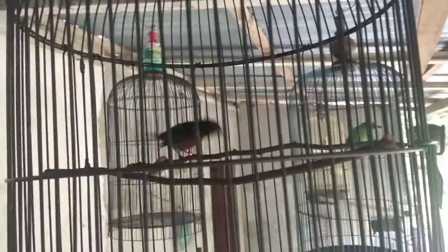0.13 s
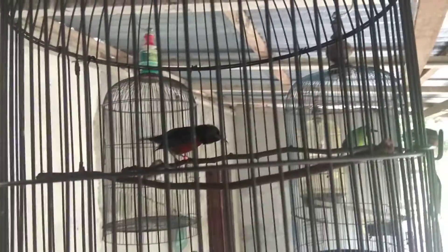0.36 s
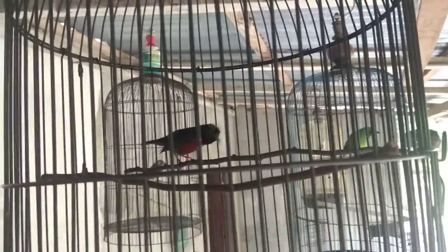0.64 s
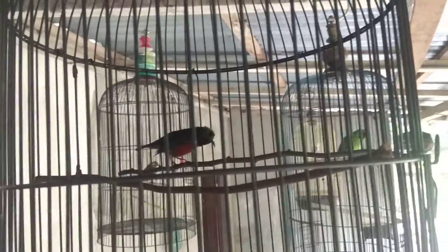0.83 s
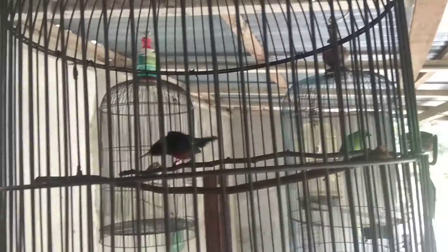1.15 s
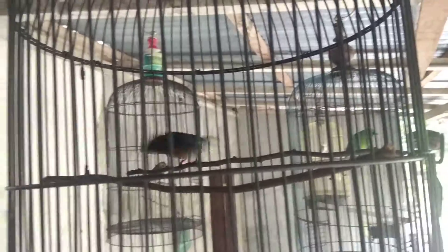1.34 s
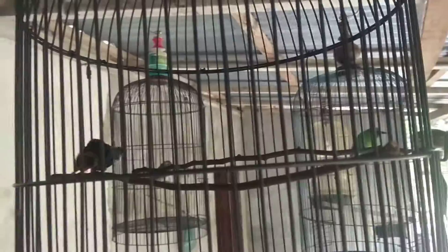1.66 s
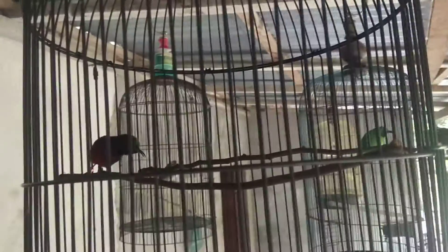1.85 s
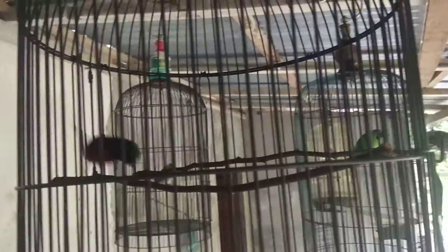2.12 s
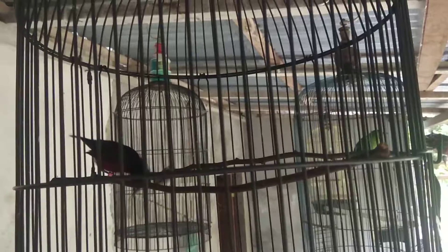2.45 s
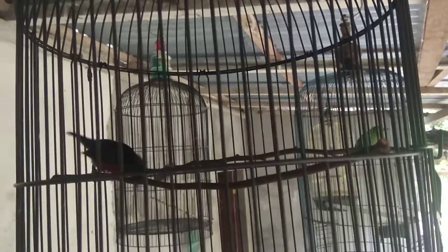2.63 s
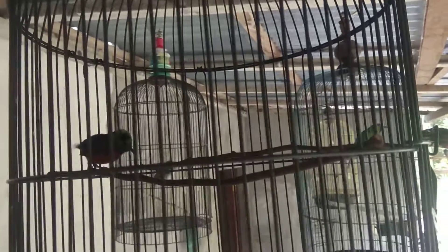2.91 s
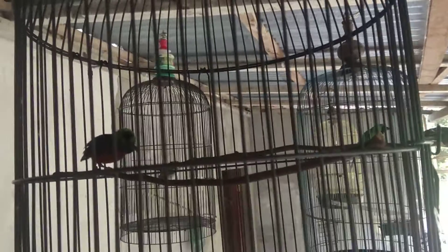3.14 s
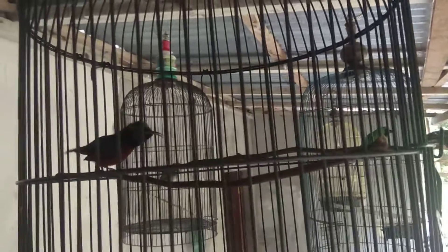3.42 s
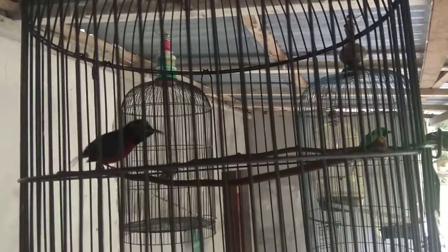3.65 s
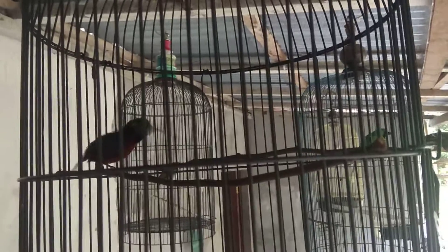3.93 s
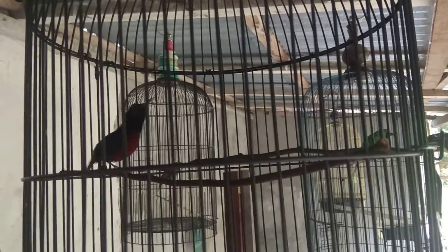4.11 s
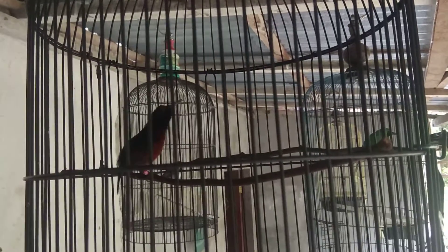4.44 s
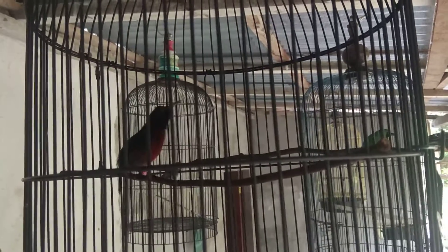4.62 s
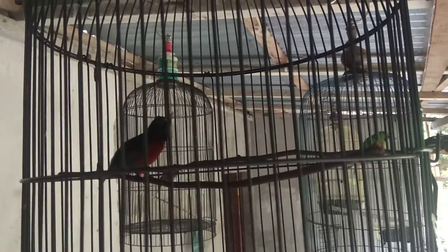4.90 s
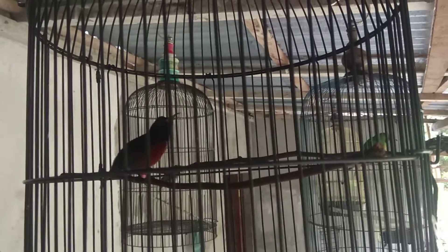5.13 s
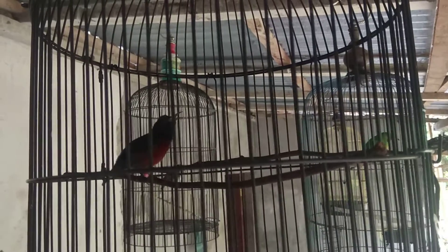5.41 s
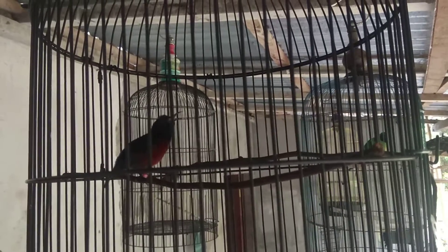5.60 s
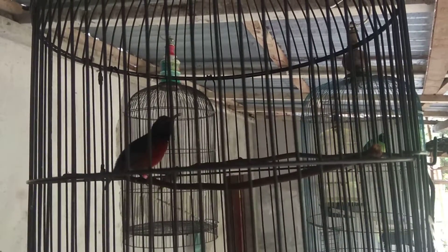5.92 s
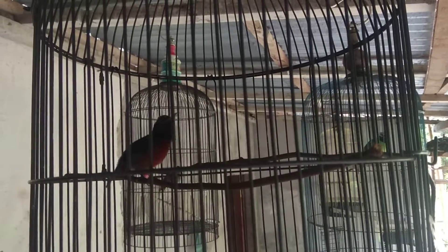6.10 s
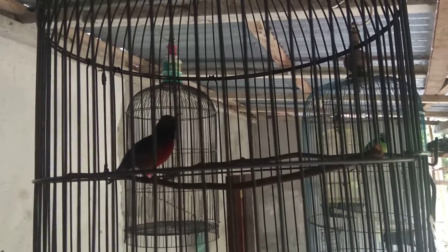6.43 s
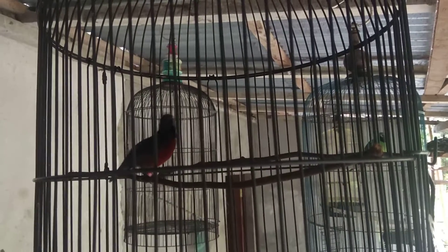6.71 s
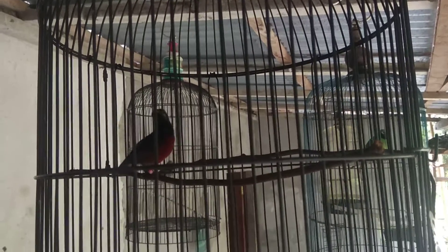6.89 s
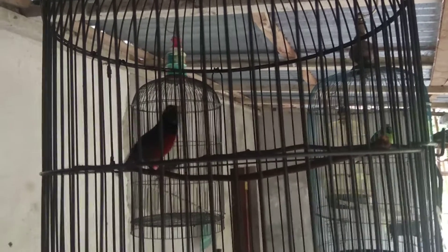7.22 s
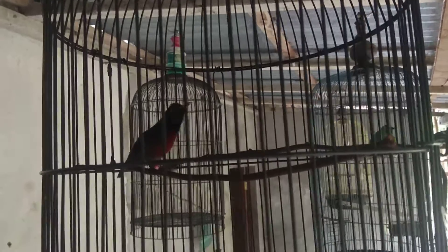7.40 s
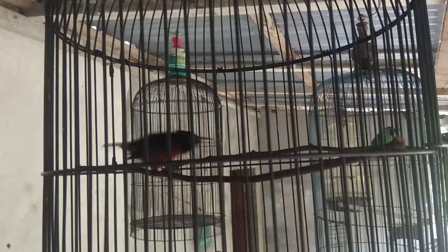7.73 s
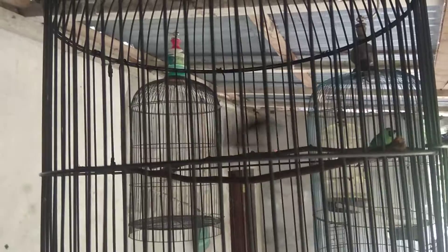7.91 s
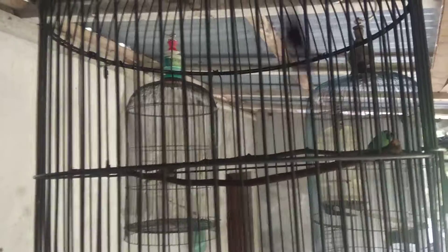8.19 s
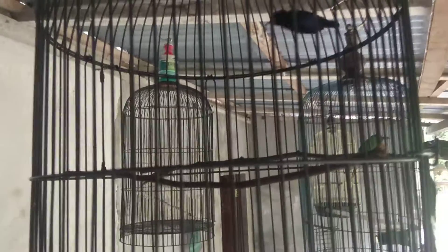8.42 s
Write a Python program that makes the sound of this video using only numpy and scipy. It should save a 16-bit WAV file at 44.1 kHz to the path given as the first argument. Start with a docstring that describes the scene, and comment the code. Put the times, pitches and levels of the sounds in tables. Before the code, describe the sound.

A small bird in a cage close to a phone sings loudly: brief buzzy warbles, two quick chip calls, light foot scuffs and more warbles. From the middle it fires a long run of sharp four-note chips, pauses, gives one last twitter and flutters away. Hard roof and walls add a short bright ring; distant traffic, a faint engine and swelling insect hiss lie behind.

```python
"""Under a sheet roof, in a cage close to a phone, a small bird hops about and sings.
Its syrinx whistles warbled phrases of bending pitch, in turn with runs of sharp four-note chips.
Filtered noise bursts are its feet and wings on the perches; the roof and walls ring briefly.
Behind it, shaped noise makes distant traffic and the thin whine and swelling hiss of insects;
summed harmonics make one passing engine, and soft gliding whistles are far birds."""
import sys
import numpy as np
from scipy import signal
from scipy.fft import rfft, irfft, next_fast_len
from scipy.io import wavfile
from scipy.ndimage import uniform_filter1d, minimum_filter1d, map_coordinates

SR = 44100
rng = np.random.default_rng(int(sys.argv[2]) if len(sys.argv) > 2 else 0)


def transcribe(u):
    """Save the signal u as a 16-bit wav file named by the first command-line argument.

    u: samples, shape (n,) or (channels, n), limited to [-1, 1]; the rate is SR.
    q: integer samples, one column per channel.
    """
    v = np.clip(np.atleast_2d(u).T, -1, 1)
    q = np.round(v * 32767).astype(np.int16)
    wavfile.write(sys.argv[1], SR, q)


N = 377054
T = np.arange(N) / SR


def undb(db):
    """Logarithmic level: decibels become an amplitude gain."""
    return 10 ** (np.asarray(db) / 20)


def unit(x):
    """Normalisation: scale to an rms of 1."""
    return x / np.sqrt(np.mean(x ** 2))


def curves(rows, t):
    """Linear interpolation: join each column of a table by straight lines in time."""
    s, *columns = np.transpose(rows)
    return [np.interp(t, np.sort(s), column) for column in columns]


def colour(x, points, tilt_db=0):
    """Spectral shaping: filter by (Hz, dB) points, with a tilt per octave above the second point."""
    size = next_fast_len(x.shape[-1])
    octave = np.log2(np.maximum(np.fft.rfftfreq(size, 1 / SR), 1))
    hz, db = np.transpose(points)
    shape_db = np.interp(octave, np.log2(hz), db)
    tilt = tilt_db * np.maximum(octave - np.log2(hz[1]), 0)
    return irfft(rfft(x, size) * undb(shape_db + tilt), size)[..., :x.shape[-1]]


def walk(rate, size=N):
    """Slow random modulation: a smoothed wander with a spread a little below 1."""
    hold = max(int(SR / rate), 1)
    steps = np.repeat(rng.standard_normal(size // hold + 2), hold)
    return uniform_filter1d(steps, hold)[:size]


def add(track, start, sound):
    """Superposition: mix a sound into a track at a time in seconds."""
    i = max(int(start * SR), 0)
    track[i:i + len(sound)] += sound[:max(N - i, 0)]


def air(points, side_db):
    """Partial coherence: coloured stereo noise with a shared middle and an opposed side part."""
    mid, side = colour(rng.standard_normal((2, N)), points)
    return unit(mid + undb(side_db) * side * np.array([[1], [-1]]))


# Distant traffic. Each row: time in seconds, rumble in dB, road noise in dB, both before a trim.
TRAFFIC = [(0.0, -57, -60.5), (2.36, -53.5, -56), (2.64, -53.5, -57), (5.5, -57, -55.5), (6.26, -53, -55.5),
           (8.55, -52.5, -61.5)]
# Spectrum of the traffic rumble. Each row: frequency in Hz, relative density in dB per Hz.
RUMBLE_COLOUR = [(25, -42.5), (70, -27), (100, -10.5), (130, 1), (180, 3.5), (220, -2), (310, -3.5),
                 (400, -2.5), (480, -19), (800, -49)]
# Spectrum of the road noise. Each row: frequency in Hz, relative density in dB per Hz.
ROAD_COLOUR = [(150, -15), (350, -5), (600, 0.5), (800, -5.5), (1200, -8.5), (1700, -9), (2500, -11.5),
               (3500, -16), (4600, -13), (6000, -17), (11000, -13.5), (16000, -14)]


def traffic():
    """Broadband noise: a low rumble and a road hiss, each with an unsteady level."""
    rumble_db, road_db = curves(TRAFFIC, T)
    rumble = air(RUMBLE_COLOUR, side_db=-18.5) * undb(rumble_db + 0.14 + 1.0 * walk(8.3))
    road = air(ROAD_COLOUR, side_db=-0.5) * undb(road_db + 6.5 + 2.78 * walk(17))
    return rumble + road


# A distant engine. Each row: time in seconds, sixth harmonic in Hz, level of the low hum in dB,
# level of the upper hum in dB, both before the exhaust filter.
ENGINE = [(0, 461.7, -61, -65), (1.4, 470.4, -62, -66), (2.2, 478.5, -68, -55.5), (5.2, 471, -60, -62),
          (6.2, 456.7, -57, -65.5), (7.35, 442, -63.5, -58), (7.8, 410, -57, -79.5),
          (8.55, 355, -72.5, -73)]
# Harmonic numbers that sound: two for the low hum, two for the upper hum.
ENGINE_ORDERS = (5, 6, 7, 8)
# Resonances of its exhaust. Each row: frequency in Hz, gain in dB.
EXHAUST = [(340, -10.5), (405, 3), (470, -8), (555, 1), (630, -3.5)]


def engine():
    """Harmonic series through resonances: four harmonics throb together, coloured by the exhaust."""
    sixth_hz, low_db, upper_db = curves(ENGINE, T)
    phase = 2 * np.pi * np.cumsum(sixth_hz / 6 * (1 + .01 * walk(30))) / SR
    throb_db = 4 * np.sin(2 * np.pi * np.cumsum(8.4 + .5 * walk(3)) / SR)  # about 8.4 throbs per s
    hum = np.zeros(N)
    for order, db in zip(ENGINE_ORDERS, [low_db, low_db, upper_db, upper_db]):
        hum += undb(db + throb_db + 2 * walk(5.1)) * np.sin(order * phase)
    return colour(hum, EXHAUST)


# Spectrum of the steady insect whine. Each row: frequency in Hz, relative density in dB per Hz.
WHINE_COLOUR = [(6400, -44), (6650, -18), (6780, -8), (6860, 5.5), (6950, -5), (7100, -15.5), (9500, -40.5),
                (11400, -15.5), (12300, -28), (13450, -17), (13750, -4.5), (14100, -23.5), (16000, -29.5)]
# Spectrum of the insect hiss. Each row: frequency in Hz, relative density in dB per Hz.
HISS_COLOUR = [(6000, -33.5), (6700, -22), (7050, -1), (7450, 4.5), (7800, -4), (9000, -22), (10000, -36),
               (16000, -30.5)]
# Swells of the hiss. Each row: peak time in seconds, peak level in dB.
SWELLS = [(.65, -52.5), (1.7, -50.5), (2.6, -51), (3.58, -51), (4.4, -48), (5.25, -47.5), (6.28, -45),
          (7.33, -48), (8.2, -50)]
SWELL_RISE_S, SWELL_FALL_S = 0.36, 0.15


def insects():
    """Narrow-band noise: a thin steady whine, and a hiss that swells about once a second."""
    whine = air(WHINE_COLOUR, side_db=0.0) * undb(-55 + 2.0 * walk(28) + 2 * walk(5.4))
    swell = np.zeros(N)
    for peak, db in SWELLS:
        width = np.where(T < peak, SWELL_RISE_S, SWELL_FALL_S)
        swell += undb(db) * np.exp(-((T - peak) / width) ** 2)
    hiss = air(HISS_COLOUR, side_db=1) * swell * undb(1.5 * walk(40))
    return whine + hiss


def syrinx(hz, second_db, third_db, jitter):
    """Self-sustained oscillation: a nearly pure trembling whistle with two weak, unsteady overtones."""
    size = len(hz)
    phase = 2 * np.pi * np.cumsum(hz * (1 + jitter * walk(1500, size))) / SR
    second = undb(second_db + 4 * walk(300, size)) * np.sin(2 * phase)
    third = undb(third_db + 4 * walk(300, size)) * np.sin(3 * phase)
    third = third * (3 * hz < SR / 2)  # silent where it would alias
    return np.sqrt(2) * (np.sin(phase) + second + third)


def sing(t, hz, db, second_db, third_db, jitter):
    """Amplitude gating: a whistle of given pitch and level, switched on and off in under 1 ms."""
    edges = np.clip(np.minimum(t - t[0], t[-1] - t) / 0.00081, 0, 1)
    return edges * undb(db) * syrinx(hz, second_db, third_db, jitter)


def glide(rows, second_db, third_db, jitter):
    """Frequency glide: a plain whistle through (s, Hz, dB) points."""
    t = np.arange(rows[0][0], rows[-1][0], 1 / SR)
    hz, db = curves(rows, t)
    return sing(t, hz, db, second_db, third_db, jitter)


# Air through the open beak. Each row: frequency in Hz, relative density in dB per Hz.
RASP_COLOUR = [(300, -29.5), (1500, -5), (4000, 0.5), (6000, -4), (8000, 8), (10000, -5), (13000, -16.5),
               (16000, -17.5)]


def rasp(voice, db):
    """Turbulence noise: a ragged hiss that follows the loudness of the voice."""
    loudness = uniform_filter1d(np.abs(voice), size=130)
    hiss = unit(colour(rng.standard_normal(N), RASP_COLOUR))
    return loudness * undb(db + 4.5 * walk(120)) * hiss


BUZZ_EDGE_S, BUZZ_ROUND = 0.0058, 1.33  # fade of a buzz; roundness of its dips (1 pointed, 2 a sine)


def buzzing(t, start, end):
    """Linear gating: 1 inside a buzzing stretch, fading to 0 beyond its edges."""
    return np.clip(np.minimum(t - start, end - t) / BUZZ_EDGE_S + 1, 0, 1)


def buzz(t, start, end, first_rate, last_rate, first_depth, last_depth):
    """Frequency modulation: round arches and sharp dips of pitch, with sliding rate and depth."""
    share = np.clip((t - start) / (end - start), 0, 1)
    turns = (t - start) * (first_rate + (last_rate - first_rate) * share / 2)
    arches = 2 * np.abs(np.sin(np.pi * turns)) ** BUZZ_ROUND
    depth = first_depth + (last_depth - first_depth) * share
    return buzzing(t, start, end) * depth * (arches - arches.mean())


# Buzzing stretches. Each row: first dip in seconds, last dip in seconds, flutters per second at first,
# flutters per second at last, depth in Hz at first, depth in Hz at last.
BUZZES = [(.357, 0.392, 57, 62, 330, 200), (1.093, 1.23, 61.5, 42.4, 350, 350),
          (1.485, 1.561, 42, 68, 260, 250), (3.11, 3.148, 65, 40, 110, 140),
          (3.168, 3.226, 63.5, 63.2, 617, 300), (7.342, 7.446, 51, 71, 463, 325)]
# Quick flicks of the voice. Each row: time in seconds, leap up or down in Hz before smoothing.
FLICKS = [(.373, -650), (.418, -650), (0.438, -1000), (0.783, -550), (.798, -260), (1.179, -450),
          (1.565, 445.5), (3.078, 297), (3.158, 441), (3.241, 598), (3.502, -350), (3.551, -350),
          (3.558, 830), (3.582, -650), (7.387, 1309), (7.477, -350), (7.489, 714)]
FLICK_S = 0.0039
SURGE_DB, SURGE_HZ_PER_S = 6.5, 280000  # the voice is stronger while its pitch falls this fast


def phrase(rows, overtone_db):
    """Coupled pitch and level: a melody buzzes and flicks, and its falling strokes are the strongest."""
    t = np.arange(rows[0][0], rows[-1][0], 1 / SR)
    hz, db = curves(rows, t)
    flutter = sum(buzz(t, *row) for row in BUZZES)
    flicks = sum(leap * np.exp(-((t - s) / FLICK_S) ** 2) for s, leap in FLICKS)
    wander = 45 * walk(160, len(t))
    hz = uniform_filter1d(hz + flutter + flicks + wander, size=60)
    slope = np.gradient(hz) * SR  # Hz per s
    db = db - SURGE_DB * np.tanh(slope / SURGE_HZ_PER_S)
    return sing(t, hz, db, second_db=overtone_db + 5, third_db=overtone_db + 3.5, jitter=0.0019)


# Warbled phrases, one melody each. Each row of a melody: time in seconds, pitch in Hz, level in dB
# before the surge and a trim.
WARBLES = [
    [(.309, 4600, -39), (.318, 4810, -41), (.323, 6400, -56), (.333, 5600, -25), (.357, 5430, -17.5),
     (.373, 4950, -24.5), (.391, 5235, -13), (.402, 6110, -17.5), (.411, 5750, -24), (.428, 4870, -26),
     (.433, 4250, -20), (.439, 4210, -35.5), (.446, 4660, -19), (.461, 4540, -23), (.467, 3890, -17.5),
     (.477, 3340, -42)],
    [(.642, 5090, -20.5), (.668, 4970, -11.5), (.692, 4840, -16), (.707, 4880, -17), (.72, 5390, -20),
     (.729, 4780, -12.5), (.743, 5160, -29), (.752, 4540, -26), (.773, 4450, -23), (.781, 3890, -24),
     (.79, 3693, -19.5), (.805, 3680, -20.5), (.812, 3500, -30)],
    [(1.06, 4100, -31.5), (1.076, 5110, -36), (1.095, 4420, -29.5), (1.11, 4410, -21.5), (1.16, 4266, -19),
     (1.183, 4190, -24.5), (1.195, 4540, -25), (1.22, 4370, -22), (1.248, 3725, -21), (1.253, 3144, -36),
     (1.26, 2650, -46.5)],
    [(1.459, 5920, -46), (1.465, 5260, -35), (1.477, 5080, -30.5), (1.486, 4460, -32.5),
     (1.513, 4760, -30.5), (1.538, 4564, -18), (1.556, 4790, -19.5), (1.566, 4850, -16.5),
     (1.575, 4470, -24.5), (1.588, 4010, -25)],
    [(3.064, 4280, -23), (3.078, 4820, -29.5), (3.088, 4500, -24.5), (3.124, 4743, -26),
     (3.16, 4600, -23.5), (3.19, 4200, -23.5), (3.207, 4190, -22.5), (3.226, 4620, -19.5),
     (3.243, 4550, -26.5), (3.254, 4230, -22.5), (3.272, 3400, -44)],
    [(3.423, 4290, -42), (3.435, 5230, -22), (3.445, 6240, -33), (3.459, 5080, -24), (3.476, 5480, -34),
     (3.497, 5200, -19.5), (3.527, 5210, -25), (3.557, 5000, -14), (3.575, 4280, -23.5), (3.583, 3636, -30),
     (3.595, 3710, -22), (3.606, 3520, -31)],
    [(3.785, 5100, -30), (3.806, 4976, -16.5), (3.84, 5170, -24.5)],
    [(7.31, 3490, -38), (7.32, 3560, -39), (7.33, 4330, -27.5), (7.343, 3760, -30.5), (7.358, 3880, -23),
     (7.372, 4240, -15.5), (7.39, 4150, -23.5), (7.43, 4016, -20), (7.465, 4156, -22), (7.504, 4396, -16),
     (7.511, 3990, -15.5), (7.528, 3510, -35.5)],
]
# Base strength of the overtones, one per phrase, in dB before an offset for each overtone.
OVERTONES = [-25.5, -26.5, -21.5, -22, -27, -24, -24.5, -26.5]
PUFF_S = 0.0086


def warbles():
    """Tone plus turbulence: each twittered phrase opens with a puff of air and carries a rasp."""
    voice, puffs = np.zeros(N), np.zeros(N)
    for rows, overtone_db in zip(WARBLES, OVERTONES):
        start = rows[0][0]
        add(voice, start, phrase(rows, overtone_db))
        puffs += np.exp(-np.minimum(((T - start) / PUFF_S) ** 2, 30))
    return (voice + rasp(voice, db=-34.5) + rasp(puffs, db=-48.5)) * undb(1.3)


# Short flights between perches. Each row: start in seconds, end in seconds, level in dB before a trim.
FLIGHTS = [(1.452, 1.624, -62), (8.016, 8.347, -41.5)]
# Colour of rubbing feathers and claws. Each row: frequency in Hz, gain in dB before any tilt.
SCUFF_COLOUR = [(300, -13), (1400, 4), (2800, -10), (4500, -6.5), (7500, -0.5), (10000, -11.5),
                (13000, -11), (16000, -37)]


def wings():
    """Amplitude modulation: feathers swish once a wingbeat while the bird crosses the cage."""
    reach = np.zeros(N)
    for start, end, db in FLIGHTS:
        reach += undb(db) * np.sin(np.pi * np.clip((T - start) / (end - start), 0, 1))
    beat = np.sin(2 * np.pi * np.cumsum(17 + 2 * walk(33)) / SR)  # about 17 wingbeats per s
    swish = undb(4 * beat + 2.5 * walk(300))
    feathers = unit(colour(rng.standard_normal(N), SCUFF_COLOUR, tilt_db=7.5))
    return reach * swish * undb(-6.5) * feathers


# Feet and wings on the perches. Each row: start in seconds, level in dB before the envelope,
# decay time in seconds (at least 0.002 is used), brightness in dB per octave.
SCUFFS = [(1.59, -39.5, 0.016, -4.5), (2.288, -31.5, 0.015, 5.5), (2.441, -30.5, 0.026, 5.5),
          (2.644, -36, 0.018, 9), (2.804, -35.5, 0.023, 19), (2.878, -21, 0.0049, 5),
          (2.963, -20, 0.0079, 23), (3.043, -35.5, 0.011, 4), (4.06, -29.5, 0.015, 5),
          (4.145, -26, 0.022, 17), (4.35, -40.5, 0.096, 7.5), (4.442, -25.5, 0.017, 6.5),
          (5.608, -37.5, 0.13, 14), (5.814, -37.5, 0.073, 10)]


def scuffs():
    """Friction noise: claws and feathers rub the perch in quick, grainy bursts that die away."""
    out, t = np.zeros(N), np.arange(SR // 4) / SR
    for s, db, length, tilt_db in SCUFFS:
        grains = rng.standard_normal(len(t)) * undb(3 * walk(700, len(t)))
        shape = (1 - np.exp(-t / .002)) * np.exp(-t / max(length, .002))
        add(out, s, undb(db) * shape * unit(colour(grains, SCUFF_COLOUR, tilt_db)))
    return out


CHIP_S = .0155
DIVE_HZ, DIVE_S = 1800, 0.00078  # greatest height and decay time of the dive that opens a chip note
ARCH_HZ = 165  # average sag of pitch at both ends of a note


def chip(hz, fall):
    """Frequency sweep: a note dives onto its pitch, swells, arches and droops; no two bend alike."""
    t = np.arange(0, CHIP_S, 1 / SR)
    u = t / CHIP_S
    dive, arch = rng.random(2)
    sag = 2 * arch * ARCH_HZ * (2 * u - 1) ** 2
    plunge = dive ** 2 * DIVE_HZ * np.exp(-t / DIVE_S)
    pitch = hz - fall * (u - .5) - sag + plunge + 45 * walk(250, len(t))
    swell = np.sin(np.pi * u) ** 1.15
    return swell * syrinx(pitch, second_db=-24.5, third_db=-27.5, jitter=.0035)


# Chip notes, four to a call. Each row: middle in seconds, pitch in Hz, fall over the note in Hz
# (negative rises), level in dB before a trim.
CHIPS = [(1.799, 5230, 450.5, -8.5), (1.8235, 5410, 549.5, -6), (1.8612, 5404, 847, -7.5),
         (1.885, 5340, 1048, -7.5), (2.0097, 5274, -3.5, -6.5), (2.038, 5360, 646.5, -8),
         (2.067, 5520, 603, -9), (2.0929, 5520, 1047.5, -8.5), (4.615, 5394, 1, -6.5),
         (4.637, 5470, 595, -2.5), (4.668, 5460, 297, -5.5), (4.6925, 5620, 1043, -5),
         (4.8209, 5420, 300, -5), (4.8497, 5490, 390, -4.5), (4.8771, 5510, 342, -9),
         (4.9032, 5445, 501, -4.5), (5.0201, 5320, 547, -5), (5.047, 5460, 1047, -8),
         (5.074, 5450, 142, -2.5), (5.1, 5465, 987, -8.1), (5.235, 5430, 400, -2),
         (5.2618, 5560, 1197, -7.3), (5.2911, 5520, 446, -7.5), (5.318, 5450, 646, -3.5),
         (5.4334, 5383, 298, 0.5), (5.463, 5502, 152, -7), (5.489, 5540, 449, -6.0), (5.513, 5500, 449, -6),
         (5.6534, 5634, -200, -2), (5.684, 5610, 297, -5), (5.7112, 5480, 399, -6.5),
         (5.735, 5460, 300, -3.5), (5.8688, 5670, -200, -5), (5.9001, 5390, 547, -3.5),
         (5.93, 5590, 398, -8), (5.9551, 5605, 647, -7), (6.08, 5260, 645, -7.4), (6.1069, 5459, 848, -6),
         (6.1415, 5445, 245, -3.5), (6.1679, 5450, 496, -4), (6.3132, 5290, 405, -4),
         (6.341, 5480, 700, -2.5), (6.374, 5450, 396, -8), (6.402, 5490, 950, -8.5)]
UPSTROKE_DB, FOOT_HZ = -16, 280  # climb relative to its notes; how far below a note's end it starts


def upstrokes():
    """Continuous phonation: in a call the voice climbs softly from one note's foot to the next's head."""
    out = np.zeros(N)
    for i, (note, following) in enumerate(zip(CHIPS, CHIPS[1:])):
        if (i + 1) % 4 == 0:  # the last note of a call
            continue
        s, hz, fall, db = note
        s2, hz2, fall2, db2 = following
        foot = (s + CHIP_S / 3, hz - fall / 2 - FOOT_HZ, db + UPSTROKE_DB)
        head = (s2 - CHIP_S / 3, hz2 + fall2 / 2, db2 + UPSTROKE_DB)
        add(out, foot[0], glide([foot, head], second_db=-19, third_db=-24, jitter=.015))
    return out


# Squeaks from the second side of the syrinx. Each row: start in seconds, starting pitch in Hz,
# level in dB before a trim, length in seconds.
SQUEAKS = [(0.648, 5740, -14.5, 0.018), (3.743, 10940, -35.5, 0.029), (3.789, 6470, -24.5, 0.027),
           (5.244, 7150, -37, 0.013), (5.299, 7010, -24, 0.017)]
SQUEAK_FALL = 0.068  # share of its pitch that a squeak loses


def chips():
    """Two sound sources: calls of four quick, mostly falling notes, and now and then a higher squeak."""
    out = upstrokes()
    for s, hz, fall, db in CHIPS:
        add(out, s - CHIP_S / 2, undb(db) * chip(hz, fall))
    for s, hz, db, length in SQUEAKS:
        rows = [(s, hz, db), (s + length, hz * (1 - SQUEAK_FALL), db)]
        add(out, s, glide(rows, second_db=-15.5, third_db=-38.5, jitter=.04))
    return (out + rasp(out, db=-43)) * undb(1.77)


# Far birds, one list a call. Each row of a call: time in seconds, pitch in Hz, level in dB
# before the reverberation is added.
FAR_CALLS = [
    [(6.71, 1700, -60), (6.79, 1736, -63.5), (6.82, 1716, -51.5), (6.85, 1720, -77.5)],
    [(4.395, 3770, -57.5), (4.43, 4004, -55), (4.47, 3540, -58)],
]


def far_birds():
    """Gliding tones: soft whistles from other cages."""
    out = np.zeros(N)
    for rows in FAR_CALLS:
        add(out, rows[0][0], glide(rows, second_db=-20, third_db=-26, jitter=.03))
    return out


# First echoes from the cage floor, wall and roof. Each row: delay on the left in seconds,
# delay on the right in seconds, level in dB before an offset for each kind of sound.
ECHOES = [(.0031, .0034, -15), (.0052, .0062, -17), (.0099, .0114, -18)]
# As the bird changes perch, direct sound reaches the left microphone later. Each row: time in seconds,
# lag in samples. The far birds share this lag.
LEFT_LAG = [(.8, 11.8), (1.15, 14.7), (1.55, 17.1), (1.85, 15.9), (2.05, 15.3), (3.8, 15), (4.6, 13.8),
            (6.4, 13.7), (7.4, 14.3)]


def porch(x, echo_db, wet_db, t60, late_db, late_t60):
    """Reverberation: direct sound, three echoes, a bright early tail off the metal roof and a dull late one."""
    t = np.arange(SR) / SR
    early, late = rng.standard_normal((2, 2, SR))
    early = colour(early, [(6500, 2.5), (10000, 6)])
    late = colour(late, [(3500, 2.0), (5500, -6.0), (12000, -22.0)])
    tail = early * undb(-60 * t / t60) + late * undb(late_db - 60 * t / late_t60)
    onset = np.clip((t - .004) / 0.0029, 0, 1)
    response = undb(wet_db) * unit(tail * onset) / np.sqrt(SR)
    for left, right, db in ECHOES:
        response[[0, 1], [int(left * SR), int(right * SR)]] += undb(db + echo_db)
    lag, = curves(LEFT_LAG, T)
    delayed = map_coordinates(x, [np.arange(N) - lag], order=5)
    direct = np.array([delayed, x])
    return direct + signal.fftconvolve(x[None], response, axes=1)[:, :N]


def scene():
    """Superposition: the bird in its cage, its far neighbours, the street and the insects."""
    street = traffic() + engine()
    chorus = insects()
    song = porch(warbles(), echo_db=0, wet_db=-6, t60=0.26, late_db=-19, late_t60=0.6)
    hops = porch(scuffs() + wings(), echo_db=2, wet_db=-4, t60=.24, late_db=-19, late_t60=.6)
    calls = porch(chips(), echo_db=-4, wet_db=-8, t60=.33, late_db=-19, late_t60=.6)
    far = porch(far_birds(), echo_db=-21, wet_db=11.5, t60=0.21, late_db=-29.0, late_t60=0.6)
    return song + calls + hops + far + street + chorus


# The right microphone faces away. Each row: frequency in Hz, gain in dB.
RIGHT_MIC = [(100, 1), (700, -1), (1500, -2.5), (3500, -0.5), (4500, 3), (5500, -3), (7000, -2),
             (8700, -15), (10500, -12.5), (13000, -19), (16000, -19.5)]
CEILING, TOP_HZ = .87, 15850  # limiter threshold as a share of full scale; upper band edge


def record(dry):
    """Limiting and band limitation: a duller right side, the loudest notes held down, the top cut."""
    both = np.array([dry[0], colour(dry[1], RIGHT_MIC)])
    headroom = CEILING / np.maximum(np.abs(both).max(axis=0), CEILING)
    gain = uniform_filter1d(minimum_filter1d(headroom, size=261), size=261)
    low_pass = signal.ellip(10, .2, 70, TOP_HZ, fs=SR, output="sos")
    return signal.sosfilt(low_pass, both * gain)


dry = scene()
out = record(dry)
transcribe(out)
```